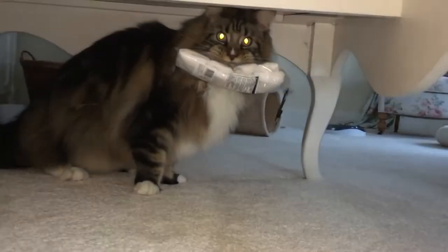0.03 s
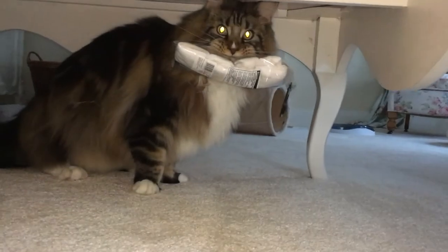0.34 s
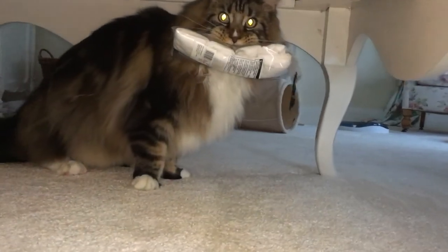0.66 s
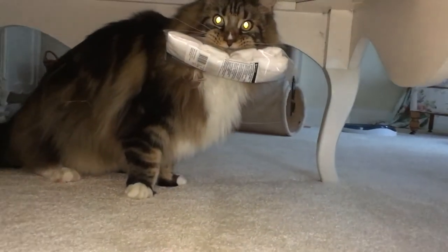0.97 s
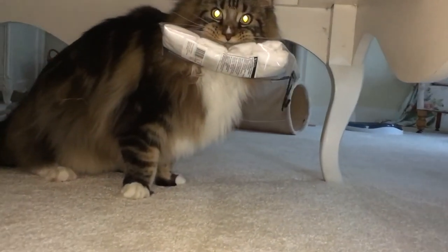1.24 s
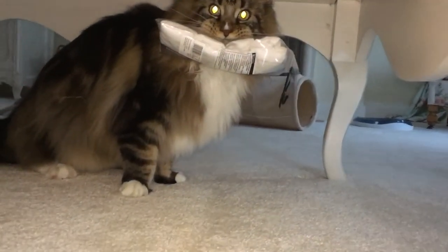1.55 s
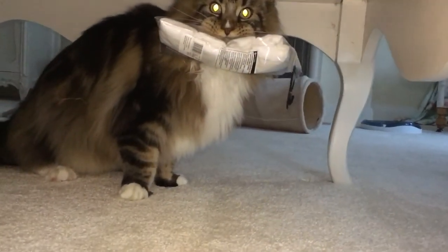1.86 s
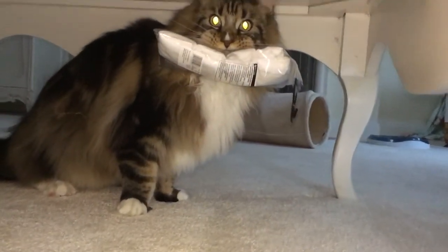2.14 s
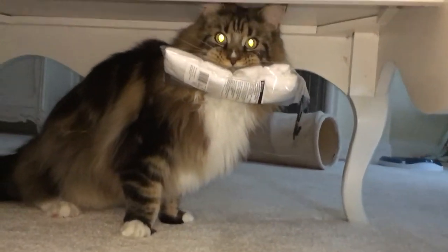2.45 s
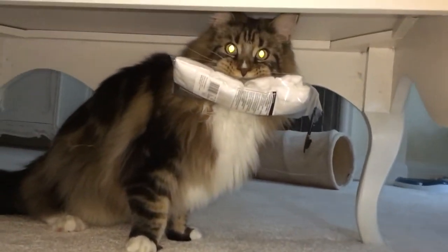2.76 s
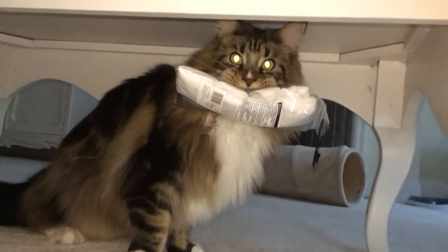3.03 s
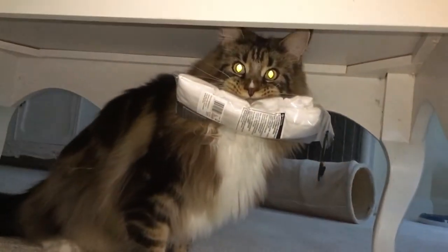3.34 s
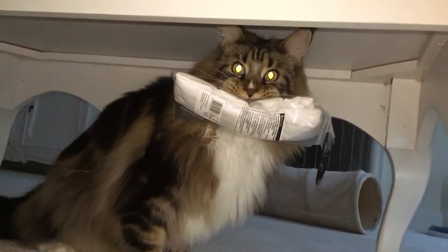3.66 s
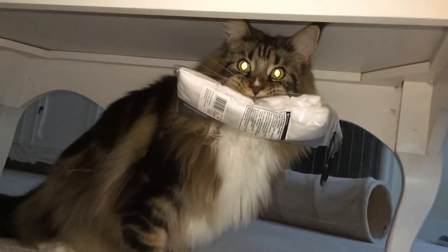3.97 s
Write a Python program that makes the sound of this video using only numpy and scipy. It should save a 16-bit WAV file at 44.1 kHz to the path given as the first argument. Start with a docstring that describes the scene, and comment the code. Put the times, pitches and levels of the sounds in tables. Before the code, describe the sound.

A cat's low, pulsing growl rumbles on indoors over faint background hiss.

```python
"""A cat growls through a plastic packet held in its jaws, under a table in a quiet carpeted room.
Its slack vocal folds flap in short surges: the airflow hums, and each closure knocks on chest and
throat, with a rasp coloured by mouth and room together. Air hisses through the nose once a cycle.
One close microphone also picks up faint packet ticks, a soft bump, short echoes and low room tone."""
import sys
import numpy as np
from scipy import signal
from scipy.fft import rfft, irfft
from scipy.io import wavfile
from scipy.ndimage import uniform_filter1d

SR = 44100
rng = np.random.default_rng(int(sys.argv[2]) if len(sys.argv) > 2 else 0)


def put_to_file(sound):
    """Save the sound as 16-bit audio at rate SR, in the file named by the first command-line argument."""
    columns = np.atleast_2d(sound).T  # one column per channel
    safe = np.clip(columns, -1, 1)
    whole_steps = np.round(safe * 32767)
    wavfile.write(sys.argv[1], SR, whole_steps.astype(np.int16))


N = 176400

# Course of the voice: t/s, hum fundamental/dB and octave/dB (both ahead of the hum's band-pass),
# mouth opening/dB, throat opening/dB
VOICE = [(.72, -75, -37.5, -1, -1), (.775, -47, -52, -4.5, 1), (.87, -45.5, -46, -2.5, -0.5),
         (1.02, -42, -47, 0, -0.5), (1.6, -45.5, -45, -1, 0), (2.15, -46, -36, 0, -3),
         (2.42, -56.5, -20.5, -0.5, -2), (2.62, -44, -36.5, 0.5, -0.5), (3.2, -43, -44, -0.5, 0),
         (3.45, -49.5, -41.5, 1, 0.5), (3.98, -47, -38, 1, 1)]


def growl(attack_s=.05, hum_ahead_s=.0027):
    """The folds swell into motion and drive hum, rattle and hiss together; the packet crackles along."""
    t = np.arange(N) / SR
    times, dbs = closures()
    phase = np.interp(t, times, np.arange(len(times)))  # counts fold cycles
    swell = np.clip((t - VOICE[0][0]) / attack_s, 0, 1)
    # the airflow swells just before the closures harden
    airflow = hum(phase, np.interp(t + hum_ahead_s, times, dbs))
    return airflow + swell ** 2 * (nose_hiss(phase) + packet_crackle() + rattle(times, dbs))


def closures(lead_cycle_s=.0102, sag=.015, softest_db=-23, jitter_s=.00035, shimmer_db=1):
    """Times and strengths of fold closures: a quick build-up, then a slowing, fading run per surge."""
    # Surges: t/s of the peak, nominal fold rate/Hz, strength/dB, fade/dB per cycle,
    # build-up/dB per cycle, cycles of build-up
    surges = [(.791, 87, -11, 1.3, 3, 6), (.860, 82, -12, 2, 0, 0), (.930, 85, -8, 1.8, 2, 2),
              (1.012, 87, -3, 1.4, 2.5, 2), (1.092, 84, -3, 1.3, 1, 1), (1.174, 84, -3, 1.3, 2, 1),
              (1.234, 92, -3, 1, 0, 0), (1.266, 81, -3, 4, 0, 1), (1.338, 83, -2, 1.8, 0, 0),
              (1.443, 78, -1.5, 3.4, 1, 2), (1.528, 80, -1, 3.8, 4.5, 2), (1.601, 80, -1, 2.8, 2.5, 1),
              (1.685, 78, -1, 7, 9, 1), (1.758, 79, -3, 4, 5, 1), (1.830, 77, -1, 6, 8, 1),
              (1.892, 81, 0, 3.4, 6, 1), (1.963, 80, 0, 4.5, 1, 1), (2.023, 78, 2, 3, 4, 2),
              (2.095, 84, 1, 2.5, 5, 1), (2.140, 80, 2, 4, 3, 1), (2.187, 88, 3, 3.5, 7, 1),
              (2.220, 86, 2, 2.5, 0, 0), (2.263, 96, 1, 2, 3, 1), (2.313, 104, 1, 2, 5, 1),
              (2.342, 113, 1.5, .2, 0, 0), (2.465, 102, 2, .3, 12, 1), (2.554, 82, 5, 3, 5, 1),
              (2.600, 84, 5, 4, 5, 1), (2.646, 80, 4, 4.4, 3, 1), (2.706, 81, 1, 4.5, 11, 1),
              (2.765, 80, 1, 5, 13, 1), (2.812, 84, 1, 5, 11, 1), (2.870, 79, 1, 7, 1, 1),
              (2.908, 92, -1, 1, 7, 1), (2.930, 78, 0, 7, 0, 0), (2.979, 78, 2, 6.5, 3, 1),
              (3.027, 78, 3, 8, 13, 1), (3.075, 75, 4, 7, 12, 1), (3.122, 80, 3, 5, 2, 1),
              (3.170, 80, 2, 7, 4, 1), (3.206, 82, 3, 3, 10, 1), (3.255, 74, 3, 4, 3, 1),
              (3.331, 76, 0, 4, 2, 1), (3.380, 78, 2, 5, 11, 1), (3.440, 66, 1, 7, 13, 1),
              (3.501, 66, -1, 9, 11, 1), (3.549, 66, 0, 7, 7, 1), (3.625, 68, -4, 7, 0, 0),
              (3.677, 66, -3, 5, 5, 1), (3.752, 63, -3, 6, 0, 0), (3.800, 68, -6, 8, 0, 0),
              (3.852, 72, -1, 6, 7, 1), (3.916, 70, -1, 6, 7, 1), (3.978, 76, -1, 6, 4, 1)]
    # Uneven folds: t/s, weakening of every second closure/dB
    alternation = [(.86, -5.5), (.93, 4), (1.13, 11), (1.2, 0), (2.28, 0.5), (2.4, 6), (2.52, 0.5)]
    times, dbs = [], []
    ends = [start - leads * lead_cycle_s for start, *_, leads in surges[1:]] + [N / SR + .02]
    for (start, hz, db, fade, build, leads), end in zip(surges, ends):
        before = np.arange(-leads, 0)
        after = np.arange(max(1, round((end - start) * hz)))
        progress = after / len(after)
        times.extend(start + before * lead_cycle_s)
        times.extend(start + (end - start) * progress * (1 - sag * (1 - progress)))
        strength = np.append(db + build * before, np.maximum(db - fade * after, softest_db))
        weakening = np.interp(start, *np.array(alternation).T) * (np.append(before, after) % 2)
        dbs.extend(strength - weakening)
    chance = rng.standard_normal((400, 2))[:len(times)]
    return np.array(times) + jitter_s * chance[:, 0], np.array(dbs) + shimmer_db * chance[:, 1]


def hum(phase, strength_db, follow=.3, waver_db=3, band_hz=(66.3, 150.4)):
    """Pulsing airflow: a fundamental and its octave waver and swell within the body's narrow band."""
    swell_db = follow * (strength_db - uniform_filter1d(strength_db, size=SR // 5))
    fundamental = -np.cos(2 * np.pi * phase) * undb(curve(VOICE, column=1) + waver_db * drift(hz=70))
    octave = np.cos(4 * np.pi * phase) * undb(curve(VOICE, column=2) + waver_db * drift(hz=70))
    body = signal.butter(3, band_hz, "band", fs=SR, output="sos")
    return signal.sosfiltfilt(body, np.sqrt(2) * (fundamental + octave) * undb(swell_db))


def rattle(times, dbs, throat_follow=.5, chest_follow=.4):
    """Closures push air, ring chest and throat, and rasp out of the nearly shut mouth into the room."""
    # Response of the throat to a closure: f/Hz, relative gain/dB
    throat_response = [(130, -14.5), (200, -5.5), (250, -0.5), (310, -0.5), (350, 1.5), (385, -0.5),
                       (440, -7.5), (500, -20.5), (620, -37), (1000, -47)]
    # Colour of each closure's rasp, shaped by mouth and room together: f/Hz, relative gain/dB
    rasp_colour = [(400, -47.5), (560, -6.5), (620, -6.5), (680, 4), (800, 1.5), (900, -6), (990, -2.5),
                   (1110, -12), (1190, -6.5), (1350, -6), (1460, -21), (1590, -29.5), (1700, -16),
                   (1820, -26), (2000, -37), (3000, -63)]
    hits = knocks(times, throat_follow * dbs)
    push = cut(ring(hits, [(44, 42, 0)]), 59, "low", order=4)  # slow push of air with each surge
    chest = ring(knocks(times, chest_follow * dbs), [(121, 36.2, 0)])
    chest = cut(cut(chest, 236, "low", order=3), 93, "high", order=3)
    throat = cut(resonate(hits, throat_response), 1800, "low", order=2)
    rasp = cut(resonate(rasp_drive(times, dbs), rasp_colour), 2280, "low", order=6)
    return (undb(-61.5) * unit(push) + undb(-43.5) * unit(chest)
            + undb(-50.5 + curve(VOICE, column=4)) * unit(throat)
            + undb(-59 + curve(VOICE, column=3)) * unit(rasp))


def knocks(times, dbs, puff=.031, puff_decay_s=.0067):
    """A sharp pulse and a short puff of turbulent air at each closure."""
    pulses = np.zeros(N)
    inside = times < (N - 1) / SR
    pulses[(times[inside] * SR).astype(int)] = undb(dbs[inside])
    return pulses + puff * decay(pulses, puff_decay_s) * rng.standard_normal(N)


def rasp_drive(times, dbs, split_hz=950, dull_follow=.97, crisp_follow=.93):
    """Each closure has a dull and a crisp part; air rasps on between closures."""
    dull = cut(knocks(times, dull_follow * dbs), split_hz, "low", order=2)
    crisp = cut(knocks(times, crisp_follow * dbs), split_hz, "high", order=2)
    air = undb(-47) * rng.standard_normal(N) * (np.arange(N) / SR > times[0])
    return dull - crisp + air


def nose_hiss(phase, pulsing=1.45, flutter_db=2.5):
    """Air through the nose: bands of hiss, opened unevenly once a cycle, shifting between two colours."""
    # Nasal resonances, early colour: f/Hz, width/Hz, relative gain/dB
    early_bands = [(2696, 58, 7), (4740, 360, 6.5), (6930, 230, 2), (8240, 660, 2), (11700, 5400, -15.5)]
    # Nasal resonances, late colour: f/Hz, width/Hz, relative gain/dB
    late_bands = [(2626, 140, 4), (3120, 360, 2), (4290, 110, -6), (5850, 250, 3.5), (6800, 260, 1.5),
                  (8000, 770, -18), (12400, 16000, -16)]
    # Course of the hiss: t/s, early level/dB, late level/dB
    levels = [(.75, -82.5, -100), (.95, -81, -120), (1.28, -79, -82), (1.6, -82.5, -128),
              (2.0, -77.5, -83.5), (2.25, -91, -88), (2.6, -80, -86), (3.2, -85, -79), (3.98, -105, -76.5)]
    gate = np.exp(-pulsing * np.cos(2 * np.pi * phase))
    air = rng.standard_normal(N) * gate * undb(flutter_db * drift(hz=70))
    air = cut(air, 1100, "high", order=2)
    early = unit(ring(air, early_bands)) * undb(curve(levels, column=1))
    late = unit(ring(air, late_bands)) * undb(curve(levels, column=2))
    return early + late


def packet_crackle(clicks_per_s=90, spread_db=2, level_db=-90):
    """Tiny random ticks of the shaken plastic."""
    # Resonances of the plastic: f/Hz, width/Hz, relative gain/dB
    bands = [(4430, 2000, -15), (7800, 1500, -21), (12500, 5800, -51)]
    clicks = (rng.random(N) < clicks_per_s / SR) * undb(spread_db * rng.standard_normal(N))
    grains = decay(clicks + 1e-18, seconds=.00019) * rng.standard_normal(N)
    return undb(level_db) * unit(ring(grains, bands))


def packet_ticks():
    """Single ticks of the plastic in the jaws, each a burst of noise through one resonance."""
    # Ticks: t/s, f/Hz, width/Hz, decay/s, level/dB
    ticks = [(.639, 12300, 1000, .004, -63), (2.578, 6900, 1200, .001, -62),
             (2.624, 4660, 1000, .0019, -63), (2.634, 8100, 3500, .0008, -63)]
    t, sound = np.arange(N) / SR, np.zeros(N)
    for start, hz, width, decay_s, db in ticks:
        burst = rng.standard_normal(N) * (t >= start) * np.exp(-np.abs(t - start) / decay_s) + 1e-18
        make_up = np.sqrt(SR / (np.pi * width))  # restores the power lost outside the band
        sound += ring(burst, [(hz, width, db)]) * make_up
    return sound


def carpet_bump():
    """One soft bump on the carpet: two low, quickly damped tones."""
    # Tones of the bump: t/s, f/Hz, decay/s, level/dB
    tones = [(0.53, 115, 0.011, -51), (0.53, 294, 0.0041, -56.5)]
    t, sound = np.arange(N) / SR, np.zeros(N)
    for start, hz, decay_s, db in tones:
        age = np.maximum(t - start, 0)
        sound += undb(db) * np.sin(2 * np.pi * hz * age) * np.exp(-age / decay_s)
    return sound


def echoes(x, t60_s=.12, delay_s=.00527, level_db=-12):
    """Short, dense reflections from the table overhead and the walls."""
    t = np.arange(SR // 3) / SR
    tail = rng.standard_normal(len(t)) * undb(-60 * t / t60_s) * (t > delay_s)
    reflected = cut(x, 113.3, "high", order=2)
    return undb(level_db) * signal.fftconvolve(reflected, tail / np.linalg.norm(tail))[:N]


def room_tone(level_db=-64):
    """The quiet room behind the cat: a low rumble under faint, even hiss."""
    # Spectrum of the room tone: f/Hz, relative level/dB
    spectrum = [(12, -24), (20, -16), (74, 2), (157, -16.5), (266, -17.5), (597, -26.5), (788, -26),
                (1230, -28), (1580, -29), (1770, -29), (1980, -30), (2680, -33.5), (3850, -33.5),
                (4550, -36), (6190, -35.5), (7950, -37.5), (15500, -41.5)]
    noise = irfft(rfft(rng.standard_normal(N)) * bin_gains(spectrum, N), N)
    return undb(level_db) * unit(noise)


def undb(db):
    """Decibels to gain."""
    return 10 ** (np.asarray(db) / 20)


def unit(x):
    """Scale to rms 1."""
    return x / np.sqrt(np.mean(x ** 2))


def curve(table, column):
    """One column of a table, joined by straight lines in time."""
    rows = np.array(table)
    return np.interp(np.arange(N) / SR, rows[:, 0], rows[:, column])


def drift(hz):
    """Smooth random drift with rms 1."""
    step = int(SR / hz)
    return unit(uniform_filter1d(np.repeat(rng.standard_normal(400), step)[:N], step))


def decay(pulses, seconds):
    """Give each pulse an exponential tail."""
    return signal.lfilter([1], [1, -np.exp(-1 / (seconds * SR))], pulses)


def ring(x, resonances):
    """Resonances (f/Hz, width/Hz, gain/dB) of alternating sign, as along a tube."""
    return sum((-1) ** k * undb(db) * signal.lfilter(*signal.iirpeak(hz, hz / width, fs=SR), x)
               for k, (hz, width, db) in enumerate(resonances))


def cut(x, hz, kind, order):
    """Low-pass or high-pass."""
    return signal.sosfilt(signal.butter(order, hz, kind, fs=SR, output="sos"), x)


def bin_gains(response, size):
    """Gain at each FFT bin of a response (f/Hz, gain/dB), joined along log frequency."""
    hz, db = np.array(response).T
    bin_hz = np.arange(size // 2 + 1) * SR / size
    return undb(np.interp(np.log(bin_hz + 1), np.log(hz), db))


def resonate(x, response, size=4096):
    """Minimum-phase filter (f/Hz, gain/dB): it rings only after it is struck."""
    cepstrum = irfft(np.log(bin_gains(response, size)))[:size // 2]
    causal = np.append(cepstrum[0], 2 * cepstrum[1:])
    impulse_response = irfft(np.exp(rfft(causal, size)))
    return signal.fftconvolve(x, impulse_response)[:N]


def scene():
    """The cat close to the microphone with the room around it, in mono."""
    near = growl() + packet_ticks() + carpet_bump()
    return (near + echoes(near) + room_tone())[None]


def record(dry, top_hz=15700):
    """The recorder cuts the top of the treble steeply."""
    return signal.sosfilt(signal.ellip(10, .2, 70, top_hz, fs=SR, output="sos"), dry)


dry = scene()
out = record(dry)
put_to_file(out)
```